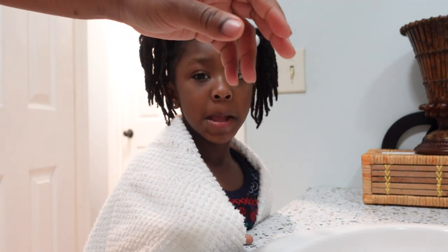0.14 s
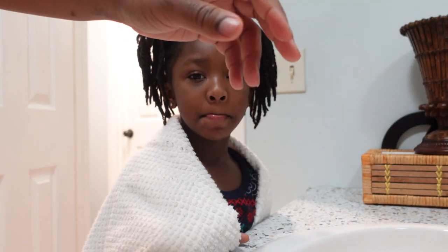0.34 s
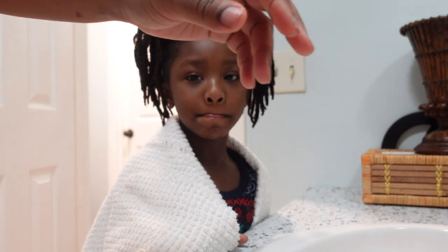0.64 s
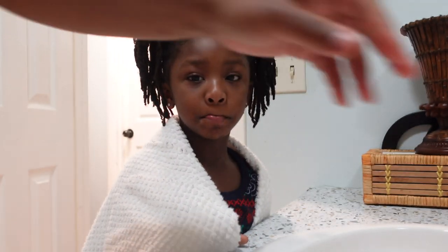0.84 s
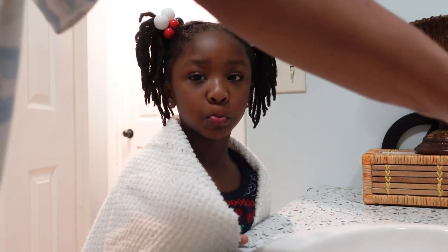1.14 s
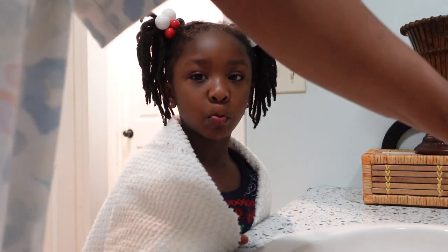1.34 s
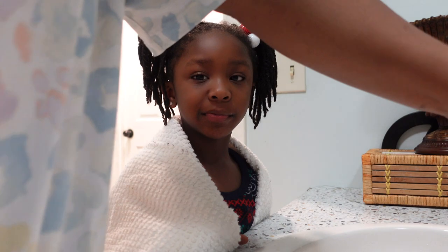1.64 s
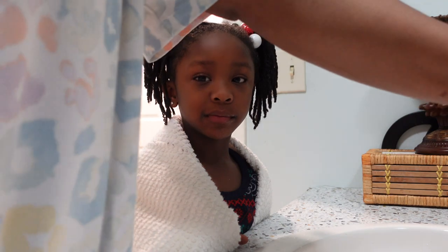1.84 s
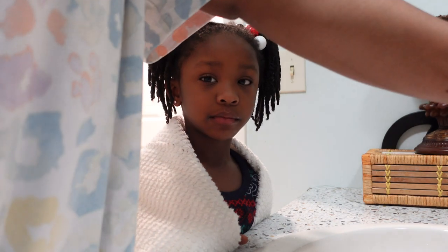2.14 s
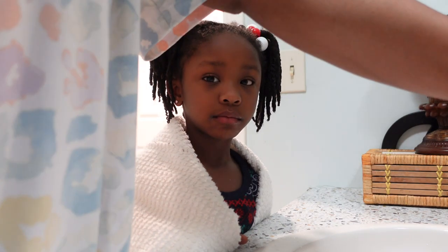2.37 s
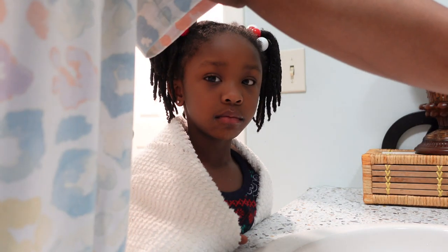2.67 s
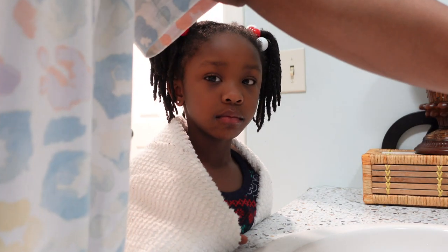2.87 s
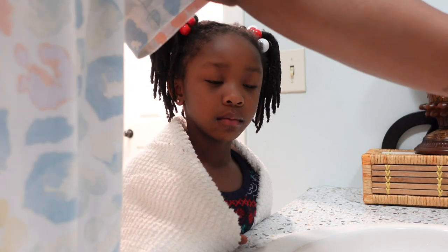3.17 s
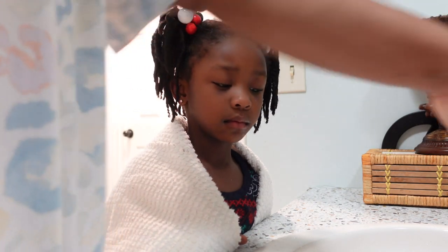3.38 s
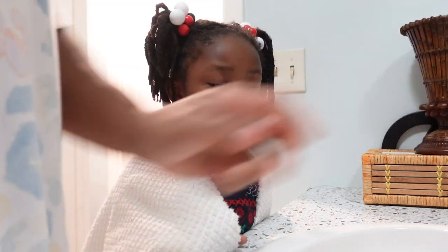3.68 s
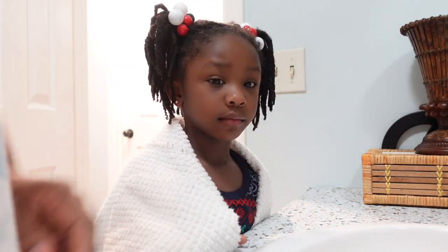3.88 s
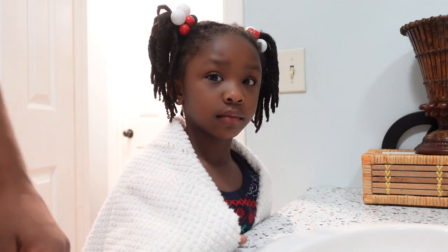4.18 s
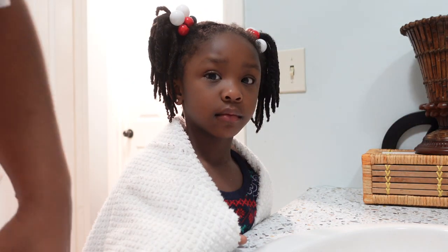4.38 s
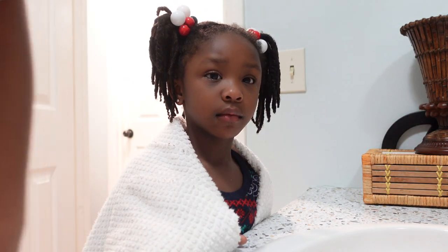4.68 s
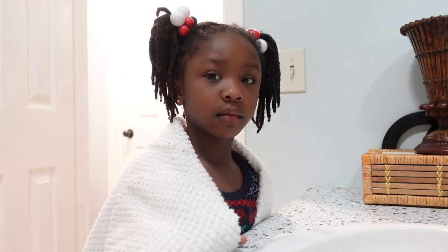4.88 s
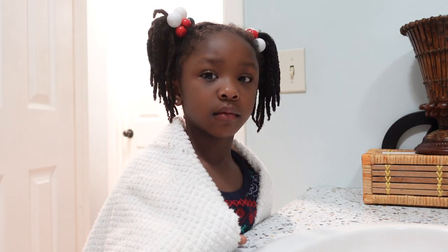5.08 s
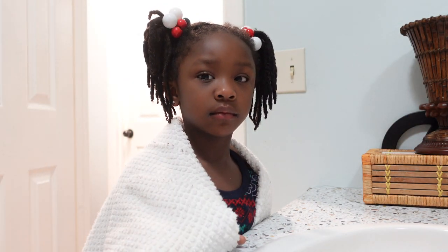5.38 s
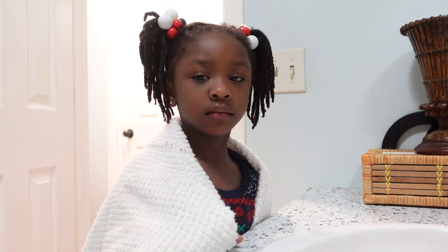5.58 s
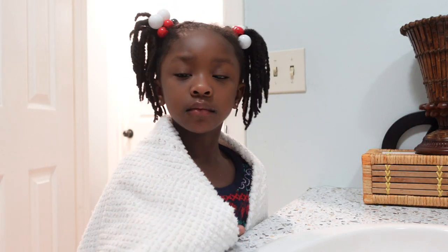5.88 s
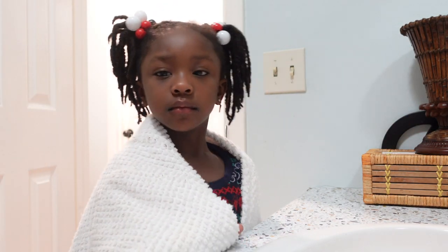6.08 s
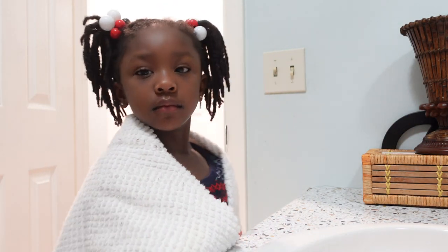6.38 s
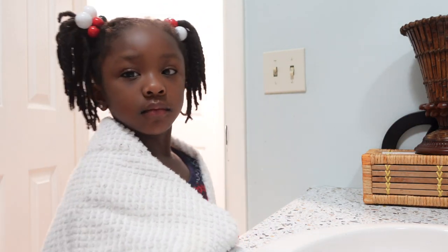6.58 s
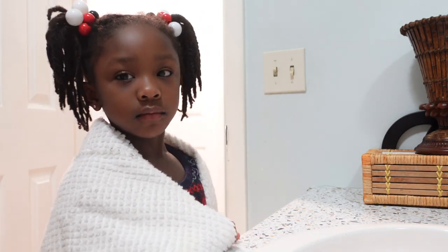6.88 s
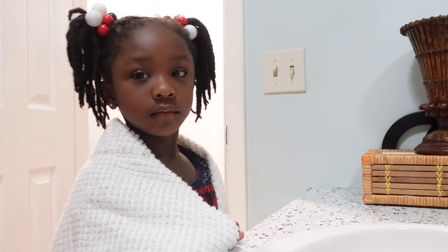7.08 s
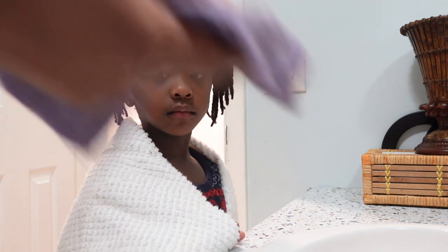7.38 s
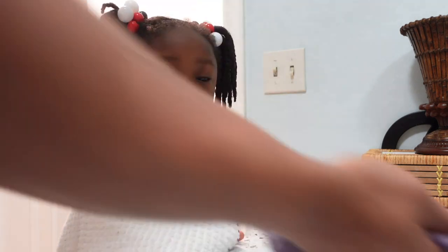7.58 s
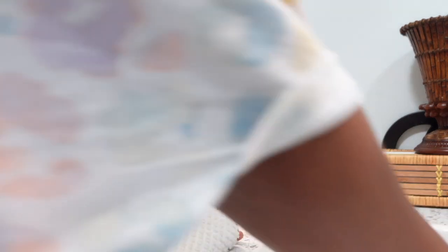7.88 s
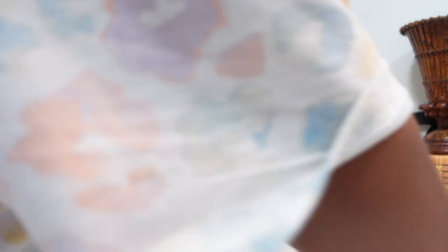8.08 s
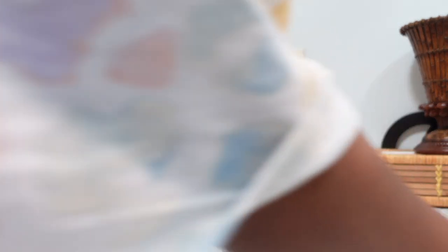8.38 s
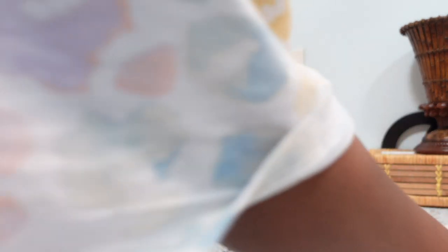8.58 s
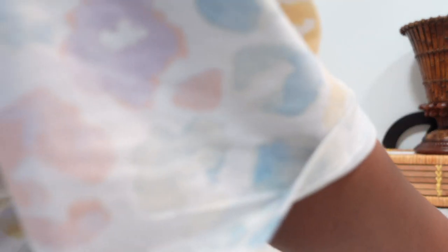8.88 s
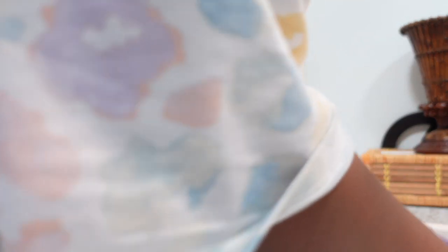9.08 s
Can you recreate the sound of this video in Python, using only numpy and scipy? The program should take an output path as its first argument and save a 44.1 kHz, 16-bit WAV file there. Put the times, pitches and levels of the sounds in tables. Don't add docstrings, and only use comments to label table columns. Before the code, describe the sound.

Quiet fan hum and soft hand thuds in a small bathroom, then a tap opens with a brief whistle and splashes steadily into a ceramic basin.

```python
import sys
import numpy as np
from scipy import signal
from scipy.fft import rfft, irfft, next_fast_len
from scipy.io import wavfile

SR = 44100
rng = np.random.default_rng(int(sys.argv[2]) if len(sys.argv) > 2 else 0)


def rack_gain(trim_db):
    fader = np.asarray(trim_db, float)
    return 10 ** (fader / 20)


def store_wav(level_fs):
    pcm = np.round(np.clip(np.atleast_2d(level_fs), -1, 1) * 32767)
    wavfile.write(sys.argv[1], SR, pcm.T.astype(np.int16))


N = 407043
SIZE = next_fast_len(N, real=True)

# f/Hz, level/dB per Hz
HUM_SPECTRUM = [(25, -36), (60, -14), (130, -1), (300, 4.5), (480, -14), (620, -12), (1080, -16),
                (1300, -6.5), (1840, -14), (2400, -14), (3500, -23.5), (4000, -23.5), (8000, -31.5),
                (16000, -44)]
# f/Hz, width/Hz, level/dB
DUCT_RESONANCES = [(130, 7.4, 3), (178, 15, 1), (651, 53, -4.5), (926, 140, -4), (1250, 43, -3),
                   (2640, 65, -13), (3180, 110, -15.5)]
# t/s, f/Hz, level/dB
DUCT_WHISTLE = [
    (0, 874, -53),
    (.9, 866, -56.5),
    (1.35, 875, -61),
    (1.8, 865, -86),
]
HUM_DB, HUM_WIDE_DB, HUM_LEAN_DB = -42.5, -13.5, -1.5

# t/s, peak level/dB, f/Hz, t60/s
THUDS = [(0.628, -48, 950, 0.1), (0.637, -44.5, 560, 0.14), (0.646, -41, 230, 0.067),
         (0.664, -44, 516, 0.07), (0.775, -50, 863, 0.12), (1.042, -45, 199, 0.055),
         (1.059, -30, 128, 0.068), (1.477, -29, 183, 0.059), (1.509, -30.5, 178, 0.07),
         (1.821, -29, 190, .07), (1.845, -31, 145, 0.083), (1.867, -28, 139, 0.086),
         (2.129, -32, 244, 0.057), (2.174, -26, 170, .07), (2.199, -25, 178, 0.056),
         (2.242, -21, 208, 0.07), (2.288, -34, 339, 0.07)]
# t/s, peak level/dB, t60/s
TICKS = [(0.3694, -52, 0.1), (1.036, -37, 0.1), (1.0444, -41, 0.17), (1.3099, -42, 0.088),
         (1.3204, -45, 0.1), (1.5135, -44, 0.1), (1.5294, -46, 0.1), (1.5594, -53, 0.1),
         (1.6771, -50, 0.11), (1.713, -48, 0.1), (1.7344, -50, 0.1)]
KNOCK = (.6155, -36.5, 1500, .04)
BLIP = (.824, -27.5, 614, .0095)

# t/s, splash level/dB
FLOW = [(1.76, -27), (1.8, -27), (1.84, -25), (2.07, -24.5), (2.3, -23.5), (2.7, -21), (2.98, -20),
        (3.3, -21.5), (3.7, -21.5), (4.2, -21), (4.9, -22.5), (5.5, -21.5), (6.4, -22), (7.2, -21.5),
        (7.56, -21), (7.8, -23), (8.1, -24), (9.23, -23.5)]
# t/s, splash gain/dB, bubbling gain/dB
SWAYS = [(2.09, -2.5, 1.5), (2.38, 4, 2), (2.72, 2.5, -6), (3.181, 1, 0.5), (3.33, 1.7, -7), (3.74, 1, 1.5),
         (4.45, 0, 5), (5.0, 2.5, 2.5), (5.19, 1.5, -1), (5.61, 1, 2.5), (6.04, 0.5, 0), (6.15, 0, 1.5),
         (6.99, -0.5, -2.5), (7.209, 0.5, -0.5), (7.84, -1, 5), (7.93, 1.5, -4.5), (8.19, 0.1, -4),
         (8.791, 1.3, 1), (8.92, 0.5, 1.5)]
# f/Hz, level/dB per Hz
WATER_SPECTRUM = [(300, 1.5), (530, -24), (800, -14.5), (1100, -16), (1500, -1), (1900, -7.5), (2400, -5),
                  (4000, -7.5), (7250, -17.5), (10800, -22), (12700, -26.5), (16000, -26)]
# f/Hz, width/Hz, level/dB
BASIN_RESONANCES = [(817, 10.7, -7.5), (1043, 230, -3), (1730, 390, -4), (3845, 240, -4), (4070, 290, -5),
                    (4480, 300, -13), (5940, 290, -13), (8050, 540, -17), (11700, 160, -22),
                    (13400, 200, -24), (13750, 130, -24), (1127, 38, -9), (1408, 40, 4), (1712, 30, -3),
                    (1870, 20, 1), (1912, 20, 4), (2220, 35, -2), (2345, 40, -8), (2612, 45, -.5),
                    (3150, 40, -5), (3276, 38, 0), (3340, 45, -2.5), (3930, 50, -2), (4780, 70, -8),
                    (5170, 64, -11), (6427, 45, -10.5), (7307, 32, -13), (7500, 35, -16), (7912, 60, -15)]
# t/s, f/Hz, level/dB
SLOSH = [
    (2.7, 842, -53),
    (2.97, 800, -38),
    (3.3, 808, -45.5),
    (6.5, 800.4, -45.5),
    (7.9, 793, -38.5),
    (9.23, 775, -32.5),
]
OPEN_S = 1.771
FILL_S, WET_S, POOLING_S, RING_UP_S = 1.71, 0.49, 0.18, 0.026
BOWL_DB, POOL_DB, DEEP_DB = (-31.5, -21), (-34, -29.5), (-59.5, -37)
FOLLOWS_FLOW, MEAN_FLOW_DB = 0.46, -21
SPRAY_DB = -0.43
DRY_NOTCH = .9
SWAY_S, CHURN_S = 0.041, 0.082
SLAP_DAMPS = 0.2
AERATOR_HZ, AERATOR_WIDTH_HZ, AERATOR_DB, AERATOR_S = 13600, 1100, -38, 3.0

# t/s, spout level/dB, gap f/Hz, gap level/dB
VALVE = [
    (1.77, -55, 5840, -27),
    (1.9, -38, 5870, -32),
    (2.12, -33, 5820, -28.5),
    (2.3, -36, 5770, -24),
    (2.325, -24, 5860, -26),
    (2.5, -24.5, 6070, -28),
    (2.7, -39, 5930, -28),
    (3.05, -24, 6020, -27.5),
    (3.35, -48, 6760, -31),
    (3.6, -60, 6900, -62),
]
# t/s, f/Hz, level/dB
CAVITY = [(1.95, 1937, -33.5), (2.18, 1950, -25), (2.27, 1837, -21.5), (2.315, 1900, -23),
          (2.335, 1641, -25.5), (2.5, 1520, -36), (2.75, 1420, -32), (2.9, 1334, -26), (3.1, 1250, -39),
          (3.3, 1139, -22), (3.5, 1130, -38)]
SPOUT_HZ = 3934

# t/s, f/Hz, level/dB
DRAIN_COLUMN = [(1.8, 255.5, -58), (2.05, 332.4, -42), (2.5, 349.6, -37.5), (3.4, 343.6, -35.5),
                (4.2, 345, -33), (4.32, 298.6, -33.5), (4.9, 292.3, -38), (5.15, 265, -30.5),
                (5.5, 271.5, -37), (6.2, 282.7, -35.5), (7.1, 298.6, -37.5), (9.23, 314, -37.5)]
# t/s, peak level/dB, f/Hz, t60/s
GULPS = [(2.018, -28, 352, 0.08), (2.244, -21, 208, 0.085), (2.31, -16.5, 339, 0.051),
         (2.813, -3.5, 342, 0.08), (2.881, -21, 364, 0.14), (2.937, -17, 394, 0.063),
         (3.203, -10, 353, 0.066), (3.8, -19, 343, 0.07), (4.032, -19.5, 354, 0.073),
         (4.152, -20, 358, 0.1), (4.3, -5.5, 290, 0.047), (4.621, -15, 290, 0.054),
         (4.952, -22, 274, 0.055), (5.351, -24, 254, 0.12), (5.992, -23, 294, 0.053),
         (6.22, -22, 277.7, 0.093), (7.262, -28, 290.4, 0.074), (7.548, -16.5, 285.6, 0.071),
         (7.699, -18.5, 270, 0.063), (8.76, -27, 300, 0.068)]
DRAIN_WIDTH_HZ, DRAIN_FLUTTER_DB, DRAIN_WANDER = 62, -1.5, .03
GULP_SWELL_S, GULP_SWELL_DB = 0.059, -23

# t/s, level/dB, f/Hz
SPLASHES = [(2.17, -22, 2086), (2.209, -29, 2030), (2.263, -23, 1900), (2.276, -24, 1894),
            (2.288, -22, 1883), (2.321, -19, 4090), (2.322, -30, 1030), (2.341, -24, 3840),
            (2.347, -18, 5030), (2.388, -16.5, 3480), (2.469, -28, 1043), (2.482, -17, 4550),
            (2.621, -15, 3789), (2.684, -17, 2610), (2.838, -17.2, 3880), (2.85, -20, 4134),
            (2.991, -13.3, 4170), (3.047, -18, 2730), (3.072, -19, 3230), (3.211, -19, 1028),
            (3.282, -15.5, 1023), (3.285, -14.3, 2571), (3.304, -16, 1052), (3.443, -15.5, 2770),
            (3.705, -19.6, 3445), (3.716, -23, 3470), (3.73, -14.5, 3480), (4.103, -18, 2583),
            (4.211, -17, 2575), (4.22, -23, 4070), (4.293, -24, 4450), (4.3, -19, 1194), (4.614, -22, 3910),
            (4.677, -12, 2560), (4.775, -20, 4810), (5.005, -18, 4306), (5.024, -18.7, 3410),
            (5.208, -14.5, 4290), (5.605, -18, 3840), (5.754, -18, 6920), (5.972, -17.5, 2560),
            (6.037, -19.5, 3240), (6.048, -17, 3290), (6.107, -18, 4995), (6.118, -21.7, 4995),
            (6.256, -20, 5167), (6.338, -19, 2928), (6.481, -20.7, 4100), (6.504, -19, 1713),
            (6.749, -19, 5480), (6.773, -16.5, 4134), (7.082, -18.5, 1725), (7.21, -17, 2756),
            (7.509, -19, 4823), (7.521, -19, 5167), (7.542, -22.0, 5167), (7.649, -23, 1038),
            (7.731, -21.5, 1190), (7.749, -18.5, 1734), (8.866, -21, 3235)]
# t/s, level/dB, f/Hz
MORE_SPLASHES = [(4.018, -21, 1147), (4.203, -20.5, 1118), (4.32, -20, 1168), (4.455, -25, 1000), (4.475, -28, 822),
                 (4.498, -18, 4420), (4.687, -20.5, 3960), (4.822, -23, 5000), (4.911, -21, 1890),
                 (4.945, -18, 1850), (4.996, -19.5, 3950), (5.185, -22, 4150), (5.915, -19, 1960),
                 (5.95, -22, 1350), (5.985, -22, 1545), (6.0, -18, 2200), (6.44, -21, 2800), (6.46, -26, 2465),
                 (7.12, -22, 5620), (7.7, -24, 5000), (7.834, -24, 1115)]
# t/s, level/dB, f/Hz
SPITS = [(3.439, -29, 8400), (3.896, -24, 8500), (4.501, -25, 7950), (4.696, -25, 7700),
         (4.993, -29, 11040), (5.384, -25, 8460), (5.459, -22, 9300), (5.715, -25, 11200),
         (5.753, -22, 10050), (6.366, -25.5, 8200), (6.619, -28, 10300), (6.826, -28, 10520),
         (6.926, -27, 11370), (7.226, -27, 10710), (7.407, -28, 9750), (8.694, -27, 8750)]
BURP = (8, -18, 1199, 0.28)
SPREAD_S, DROP_T60_S, DROP_CYCLES, DROP_LEAD_S = .004, .03, 30.0, 0.004

# f/Hz, left minus right level/dB
CAPSULE_LEAN = [(60, -1), (200, -1.5), (700, -2.5), (1800, -3.8), (2600, -2.1), (4000, -2.4), (6000, -3.6),
                (8600, -2.6), (10500, -1), (16000, 0)]
# f/Hz, left lead/rad
CAPSULE_PHASE = [(100, 0.23), (780, -0.54), (1640, -0.19), (16000, 0)]
ROOM_T60_S, ROOM_DB = .18, -13
BOWL_ECHO_DB, BOWL_ECHO_T60_S, BOWL_ECHO_HZ = -11.5, .12, 3000
CUTOFF_HZ = 15800


def rms_one(x):
    return x / np.sqrt(np.mean(x ** 2) + 1e-20)


def in_time(rows):
    s, *columns = np.transpose(rows)
    return [np.interp(np.arange(N) / SR, s, c) for c in columns]


def at_hz(points, hz):
    points = np.array(points, float)
    return np.interp(np.log(hz + 1), np.log(points[:, 0] + 1), points[:, 1])


def drift(rate):
    r = np.exp(-80 * np.pi * rate / SR)
    white = rng.standard_normal(N // 40 + 2002)
    slow = signal.lfilter([1], [1, -2 * r, r * r], white)[2000:]
    return np.interp(np.arange(N) / 40, np.arange(len(slow)), rms_one(slow))


def bumps(times, heights, half_s):
    t = np.arange(0, N + 40, 40) / SR
    bells = np.exp(-.5 * ((t[:, None] - times) / half_s) ** 2)
    return np.interp(np.arange(N) / SR, t, bells @ heights)


def settled(time_s):
    return 1 - np.exp(-np.maximum(np.arange(N) / SR - OPEN_S, 0) / time_s)


def resonance(x, hz, width):
    r = np.exp(-np.pi * width / SR)
    poles = [1, -2 * r * np.cos(2 * np.pi * hz / SR), r * r]
    return signal.lfilter([(1 - r * r) / 2, 0, (r * r - 1) / 2], poles, x)


def colour(white, spectrum, peaks):
    hz = np.arange(SIZE // 2 + 1) * SR / SIZE
    power = rack_gain(2 * at_hz(spectrum, hz))
    for top_hz, width, db in peaks:
        power = power + rack_gain(2 * db) / (1 + (2 * (hz - top_hz) / width) ** 2) ** 1.5
    return rfft(white, SIZE) * np.sqrt(power)


def bands(coloured, low_hz, high_hz, count, patchy_db, surge):
    hz = np.arange(len(coloured)) * SR / SIZE + 1
    place = count * np.log(hz / low_hz) / np.log(high_hz / low_hz)
    out = 0
    for k in range(count):
        share = np.sqrt(np.clip(1.25 - 1.5 * np.abs(place - k - .5), 0, 1) * 2 / 3)
        out = out + irfft(coloured * share, SIZE)[:N] * rack_gain(patchy_db * drift(31.4))
    return rms_one(out * rack_gain(surge))


def whistle(hz, level_db, width):
    r = np.exp(-np.pi * width / SR)
    wobble = signal.lfilter([1], [1, -2 * r, r * r], rng.standard_normal((2, N)))
    turn = 2 * np.pi * np.cumsum(hz * np.ones(N)) / SR
    return rack_gain(level_db) * rms_one(wobble[0] * np.cos(turn) + wobble[1] * np.sin(turn))


def plink(db, hz, t60, rise, noisy, broad=0.65):
    white = rng.standard_normal(SR // 8)
    t = np.arange(min(round(abs(t60) * SR) + 50, len(white))) / SR
    tone = np.sin(2 * np.pi * hz * (t + rise * t ** 2 / abs(t60)))
    burst = resonance(resonance(white, hz, hz * broad), hz, hz * broad)[-len(t):]
    burst = burst / np.sqrt(np.mean(burst[:len(t) // 4] ** 2))
    swell = (1 - np.exp(-t / (0.0008 + 1.1 / hz))) ** 2
    return rack_gain(db + 4.5 - 60 * t / abs(t60)) * swell * ((1 - noisy) * tone + noisy * burst)


def add(out, s, sound):
    i = round(s * SR)
    out[i:i + len(sound)] += sound[:N - i]


def hum():
    air = colour(rng.standard_normal((2, N)), HUM_SPECTRUM, DUCT_RESONANCES)
    alike = bands(air[0], 19.4, 15600, count=4, patchy_db=1.0, surge=0.39 * drift(7.1))
    low_pass = signal.butter(2, 7000, fs=SR, output="sos")
    unlike = signal.sosfilt(low_pass, rms_one(irfft(air[1], SIZE)[:N]))
    hz, level_db = in_time(DUCT_WHISTLE)
    breathy = whistle(hz, level_db - 5, width=23)
    pure = rack_gain(level_db + 5.0) * np.sin(2 * np.pi * np.cumsum(hz + 2.9 * drift(3.7)) / SR)
    return rack_gain(HUM_DB) * (alike + rack_gain(HUM_WIDE_DB) * unlike * [[1], [-1]]) + breathy + pure


def handling():
    out = np.zeros(N)
    for s, db, hz, t60 in THUDS:
        add(out, s, plink(db + 9.5, hz, t60, rise=0, noisy=0.36))
    add(out, KNOCK[0], plink(*KNOCK[1:], rise=0, noisy=1, broad=.95))
    high_pass = signal.butter(4, 5800, "high", fs=SR, output="sos")
    t = np.arange(SR // 6) / SR
    for s, db, t60 in TICKS:
        rustle = signal.sosfilt(high_pass, rng.standard_normal(len(t)))
        fade = rack_gain(db - 14.5 - 60 * t / abs(t60))
        add(out, s, fade * (rustle + 4.2 * resonance(rustle, 7000, 1500)))
    s, db, hz, half = BLIP
    t = np.arange(N) / SR - s
    return out + rack_gain(db) * np.exp(-.5 * (t / half) ** 2) * np.sin(2 * np.pi * hz * t)


def grains(per_s, spread_db):
    sizes = rack_gain(spread_db * np.minimum(rng.exponential(1, N), 6)) * rng.choice([-1, 1], N)
    return rms_one(sizes * (rng.random(N) < per_s / SR)) + 0.93 * rng.standard_normal(N)


def stream():
    flow_db, = in_time(FLOW)
    s, slap_db, churn_db = np.transpose(SWAYS)
    slap_db = bumps(s, slap_db, SWAY_S)
    churn_db = bumps(s, churn_db, CHURN_S)
    full = settled(FILL_S)
    swing_db = FOLLOWS_FLOW * (flow_db - MEAN_FLOW_DB)
    bowl_db, pool_db, deep_db = (empty + (brim - empty) * full + swing_db
                                 for empty, brim in (BOWL_DB, POOL_DB, DEEP_DB))
    surge = 0.23 * drift(6.8) + 0.5 * drift(28)
    water = colour(grains(6000, spread_db=2.0), WATER_SPECTRUM, BASIN_RESONANCES)
    pool = bands(water, 897, 1423, count=2, patchy_db=2.5, surge=0.8 * surge)
    pool = rack_gain(pool_db + churn_db) * pool
    deep = rack_gain(deep_db) * bands(water, 408, 892, count=2, patchy_db=1.5, surge=0.36 * surge)
    bowl = bands(water, 1592, 2177, count=2, patchy_db=1.4, surge=0.075 * surge)
    bowl = rack_gain(bowl_db - SLAP_DAMPS * slap_db) * bowl
    splash = bands(water, 2263, 4940, count=4, patchy_db=1.83, surge=0.42 * surge)
    splash = splash - DRY_NOTCH * (1 - settled(WET_S)) * resonance(splash, 3170, 730)
    spray = rack_gain(SPRAY_DB) * bands(water, 5150, 17030, count=4, patchy_db=1.35, surge=0.72 * surge)
    slosh = whistle(*in_time(SLOSH), width=113)
    hiss = settled(AERATOR_S) * whistle(AERATOR_HZ, AERATOR_DB, width=AERATOR_WIDTH_HZ)
    jet = rack_gain(flow_db - 0.6) * (rack_gain(slap_db) * splash + spray)
    body = settled(RING_UP_S) * bowl + settled(POOLING_S) ** 2 * (pool + deep)
    opened = np.clip((np.arange(N) / SR - OPEN_S) / .035, 0, 1)
    return opened * (jet + body + slosh + hiss)


def valve():
    spout_db, gap_hz, gap_db = in_time(VALVE)
    flutter_db = 1.6 * drift(10)
    spout = whistle(SPOUT_HZ, spout_db + flutter_db, width=96)
    gap = whistle(gap_hz, gap_db + flutter_db, width=780)
    cavity = whistle(*in_time(CAVITY), width=215)
    return (spout + gap + cavity) * settled(RING_UP_S)


def drain():
    hz, level_db = in_time(DRAIN_COLUMN)
    s, gulp_db = np.transpose(GULPS)[:2]
    strength = rack_gain(level_db + DRAIN_FLUTTER_DB * drift(3))
    strength = strength + bumps(s, rack_gain(gulp_db + GULP_SWELL_DB), GULP_SWELL_S)
    column = whistle(hz * (1 + DRAIN_WANDER * drift(3.043)), -3.0, width=DRAIN_WIDTH_HZ)
    out = strength * column * (np.arange(N) > 1.8 * SR)
    for s, db, gulp_hz, t60 in GULPS:
        add(out, s, plink(db + 2, gulp_hz, t60, rise=0.089, noisy=0.06))
    return out


def drops():
    out = np.zeros(N)
    for s, db, hz in SPLASHES + MORE_SPLASHES:
        t60 = DROP_T60_S + DROP_CYCLES / hz
        add(out, s - DROP_LEAD_S, plink(db + 8.5, hz, t60, rise=0.07, noisy=0.28, broad=.4))
    add(out, BURP[0], plink(*BURP[1:], rise=-.6, noisy=0.22))
    for (s, db, hz), (late, later) in zip(SPITS, rng.random((len(SPITS), 2))):
        start = s - .005
        main = plink(db + 4.5, hz, 14.0 * SPREAD_S, rise=0.089, noisy=1.0, broad=0.48)
        after = plink(db - 1.0, hz * (1.1 + .5 * later), 7.0 * SPREAD_S, rise=0.083, noisy=0.39)
        before = plink(db + 1.0, hz * (0.81 + .5 * late), 7.9 * SPREAD_S, rise=0.037, noisy=1.0)
        add(out, start, main)
        add(out, start + 1.7 * SPREAD_S * (1 + late), after)
        add(out, start - 2.5 * SPREAD_S * (1 + later), before)
    for when, pitch, size in rng.random((200, 3)):
        hz = 1600 * 5.5 ** pitch
        add(out, 2.2 + 7 * when, plink(-25 + 8.5 * size ** 2, hz, 70 / hz, rise=0.035, noisy=0.33))
    return out


def tiled_room(hz, size):
    lags = rng.uniform(0.0089, 0.021, (2, 5, 1))
    loop = rack_gain(-60 * lags / ROOM_T60_S) / (1 + (hz / 4500) ** 4) * np.exp(-2j * np.pi * hz * lags)
    tiles = 1 + rack_gain(ROOM_DB) * np.sum(loop / (1 - loop), axis=1) / np.sqrt(5)
    t = np.arange(1, SR // 4) / SR
    tail = rng.standard_normal(len(t)) * rack_gain(-60 * t / abs(BOWL_ECHO_T60_S)) * (t > .002)
    echo = rfft(tail, size) / np.sqrt(np.sum(tail ** 2))
    treble = hz ** 2 / (hz ** 2 + BOWL_ECHO_HZ ** 2)
    return tiles * (1 + rack_gain(BOWL_ECHO_DB) * treble * echo)


def scene():
    around = hum() + handling()
    basin = stream() + valve() + drain() + drops()
    size = next_fast_len(N + SR // 2)
    hz = np.arange(size // 2 + 1) * SR / size
    side = np.array([[.5], [-.5]])
    capsules = rack_gain(at_hz(CAPSULE_LEAN, hz) * side) * np.exp(1j * at_hz(CAPSULE_PHASE, hz) * side)
    heard = rfft(basin, size) * capsules + rfft(around, size) * rack_gain(HUM_LEAN_DB * side)
    return irfft(heard * tiled_room(hz, size), size)[:, :N]


def top_cut(x):
    return signal.sosfilt(signal.butter(12, 16830, fs=SR, output="sos"), x)


def record(dry):
    thin = signal.sosfilt(signal.butter(2, 70, "high", fs=SR, output="sos"), dry)
    rounded = 1.438 * np.tanh(thin / 1.797)
    size = next_fast_len(N)
    below = np.arange(size // 2 + 1) * SR / size < CUTOFF_HZ
    mix = irfft(rfft(rounded, size) * below, size)[:, :N]
    return top_cut(mix)


dry = scene()
out = record(dry)
store_wav(out)
```